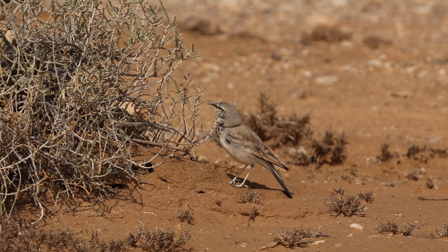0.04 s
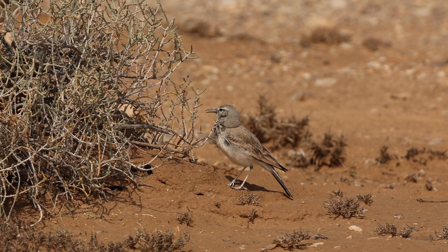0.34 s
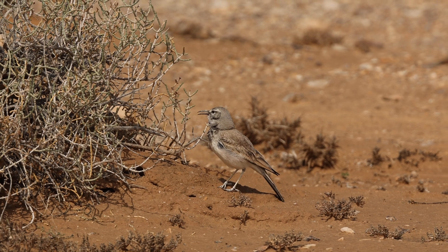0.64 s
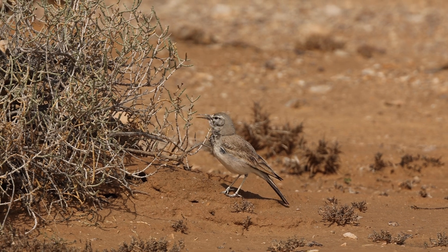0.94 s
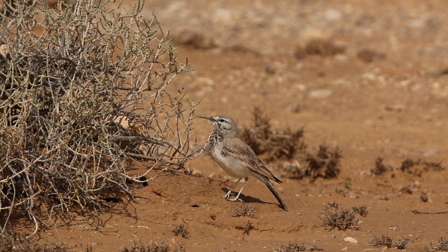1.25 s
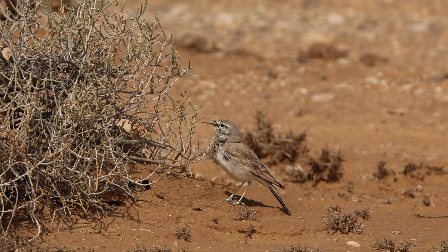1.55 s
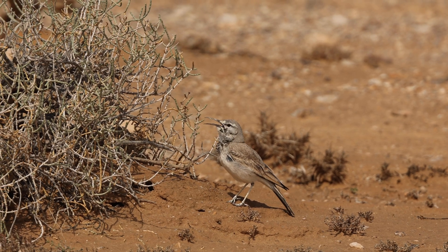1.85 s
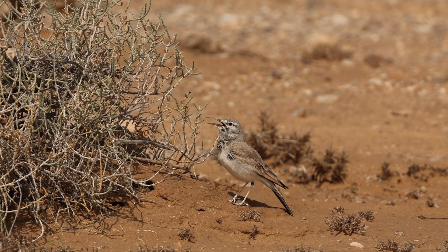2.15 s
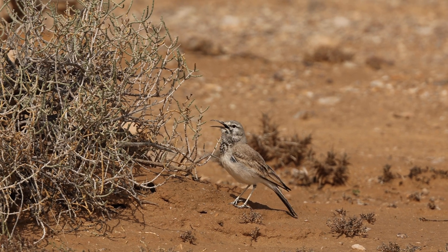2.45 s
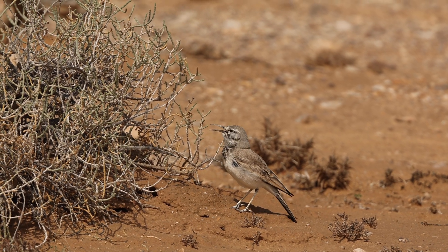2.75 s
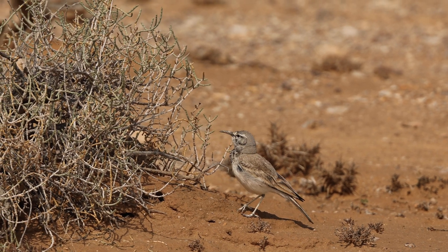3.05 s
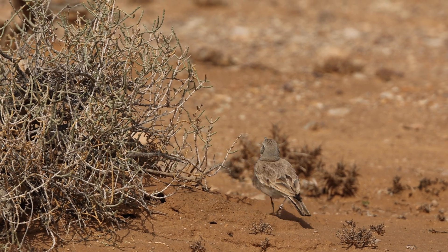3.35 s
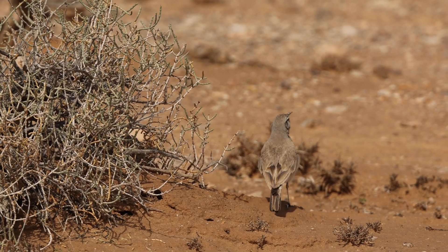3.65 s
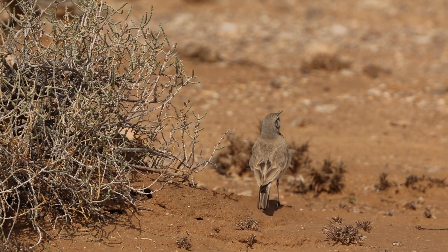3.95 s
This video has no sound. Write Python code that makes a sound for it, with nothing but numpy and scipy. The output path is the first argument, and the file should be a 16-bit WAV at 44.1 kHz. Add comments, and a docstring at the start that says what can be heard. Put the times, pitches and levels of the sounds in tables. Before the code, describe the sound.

A lark gives a few very faint long whistles in the first second. From about 1.6 to 3.1 seconds it sings nine short, clear falling whistles, growing louder, with a slight echo. Wind rumbles on the microphone throughout over faint hiss, with loud dull bumps and crackling flutter shifting between sides, strongest around 0.2 seconds, from 1.5 to 1.8, and from 3.4 to 3.9, mostly on the left.

```python
"""Open desert: a lark gives a few faint long whistles, then a run of clear falling ones that grows louder.
Each note is a nearly pure, trembling tone, and the open ground returns a faint echo.
Gusts rumble on the microphone and break into dull bumps and crackling flutter, now left, now right,
over a faint background hiss. The strongest bumps overload the recorder."""
import sys
import numpy as np
from scipy import signal
from scipy.fft import rfft, irfft
from scipy.io import wavfile

SR = 44100
rng = np.random.default_rng(int(sys.argv[2]) if len(sys.argv) > 2 else 0)


def pcm_store(signal):
    """Save signal as 16-bit PCM."""
    levels = np.round(np.clip(np.atleast_2d(signal), -1, 1) * 32767)
    wavfile.write(sys.argv[1], SR, levels.astype(np.int16).T)


N = 176400
TIME = np.arange(N) / SR
PUFF_LEAD_RAD = 1.4  # phase lead of a puff on its louder side


def lark(song_db=-4.5, end_hz=2459):
    """The song: long opening whistles, then a run of short ones that all fall to the same pitch."""
    # Falling whistles. Each row: start and length in seconds, level in dB relative to song_db,
    # starting pitch in Hz, reediness in dB.
    notes = [(1.635, .115, -42, 2640, 0), (1.8, .1, -42, 2570, 0), (1.953, .13, -31.5, 2635, 0),
             (2.116, .137, -31, 2665, 2), (2.283, .134, -29.5, 2660, 1), (2.448, .136, -31, 2615, 3),
             (2.614, .136, -27.5, 2655, 1), (2.786, .137, -25, 2605, -6), (2.953, .126, -25, 2640, -6)]
    # Partials of the voice; the throat favours the second, which is the pitch heard.
    # Each row: harmonic number, level in dB, share of the reediness.
    partials = [(2, -2, 0), (3, -29, 1), (4, -39.5, 1), (6, -46.5, .5), (8, -51.5, -1), (10, -48.5, -.3),
                (11, -48.5, .8)]
    # Opening whistles. Each row: start and length in seconds, level in dB, first and last pitch in Hz.
    long_notes = [(-.2, 0.37, -61, 2100, 2090), (.52, .25, -56, 2168, 2142), (.785, .14, -60, 2135, 2120)]
    # Their plainer tone. Each row: harmonic number, level in dB, share of the reediness.
    long_partials = [(2, 4.5, 0), (3, -9, 0)]
    song = np.zeros(N)
    for start, length, db, from_hz, reedy_db in notes:
        add(song, start, whistle(length, song_db + db, from_hz, end_hz, partials, reedy_db))
    for start, length, db, from_hz, to_hz in long_notes:
        add(song, start, whistle(length, db, from_hz, to_hz, long_partials))
    return song


def whistle(length, db, from_hz, to_hz, partials, reedy_db=0, tremble_s=.008, fade_s=.02):
    """A nearly pure, slightly trembling note that swells as its pitch falls and flattens out."""
    t = np.arange(0, length, 1 / SR)
    progress = t / length
    glide_hz = to_hz + (from_hz - to_hz) * (1 - progress) ** 2.4
    hz = glide_hz * (1 + .0026 * drift(t, tremble_s))
    cycles = np.cumsum(hz / 2) / SR  # the fundamental lies an octave below the pitch heard
    odd_db = -200 * (progress - .69) ** 2  # odd overtones flash up late in the note
    tone = 0
    for k, partial_db, share in partials:
        flicker_db = (k > 2) * drift(t, step_s=.038)
        level_db = partial_db + share * reedy_db + k % 2 * odd_db + flicker_db
        tone = tone + amp(level_db) * np.sin(2 * np.pi * k * cycles)
    fades = np.minimum(t / fade_s, 1) * np.minimum((length - t) / fade_s, 1)
    swell_db = -19 * (progress / .74 - 1) ** 2  # crests about three quarters through
    tremble_db = 1.1 * drift(t, tremble_s)
    return unit(tone) * fades * amp(db + swell_db + tremble_db)


def ground_echo(song, t60_s=.44, delay_s=.012, left_right_db=(-15, -7.5)):
    """The thin echo that ground and bushes scatter back."""
    t = TIME[:SR]
    tail = rng.standard_normal((2, SR)) * amp(-60 * t / t60_s) * (t > delay_s)
    tail = unit(tail) / np.sqrt(SR) * amp(left_right_db)[:, None]
    return signal.fftconvolve(song[None], tail, axes=1)[:, :N]


def bumps(scatter_s=.003, ring_s=.0025):
    """Each bump is one puff on the microphone that rings briefly, with weaker ones scattered around it."""
    # Each row: time in seconds, peak in dB, left minus right in dB, centre in Hz.
    hits = [(0.014, -8.5, 7, 840), (0.121, -4.0, 10, 960), (0.162, 1.5, -7, 890), (0.171, -3.5, -7, 640),
            (0.182, 3.5, -1, 1040), (0.22, -5.0, 3, 1300), (0.234, -9.0, -4, 920), (0.244, -6.0, -7, 940),
            (0.279, -6.5, -10, 1250), (0.29, -3.5, -9, 1150), (0.298, -5.0, -7, 940),
            (0.31, -3.5, -7, 1070), (0.376, -15.5, -4, 670), (0.609, -15.0, 6, 600),
            (0.729, -15.0, -8, 590), (0.77, -16.5, -1, 610), (0.781, -9.0, -8, 680), (0.848, -5.0, 9, 720),
            (0.869, -6.0, 8, 790), (0.897, -3.5, 11, 1000), (0.911, -7.0, 11, 1030), (1.052, -9.0, 9, 840),
            (1.123, -18.0, 6, 540), (1.305, -9.5, -11, 580), (1.377, -10.0, -8, 400),
            (1.474, -10.0, -4, 700), (1.498, -9.5, -6, 480), (1.518, -5.5, -8, 680), (1.533, -3.5, 3, 1100),
            (1.549, 5, -10, 1160), (1.564, -4.5, -10, 890), (1.587, -6.5, 11, 1080),
            (1.601, -9.5, -12, 750), (1.66, -3.5, -8, 650), (1.672, -3.5, -8, 640), (1.693, 0.5, -10, 870),
            (1.741, -10.5, -6, 630), (1.771, 4, -10, 1060), (1.785, -7.5, -9, 980),
            (1.799, -6.5, -11, 1060), (1.859, -5.5, -9, 770), (2.098, -11.0, -5, 450),
            (2.196, -6.5, 8, 890), (2.211, -7.0, 8, 530), (2.232, -7.5, 5, 500), (2.332, -8.0, -9, 570),
            (2.39, -7.0, 3, 650), (2.407, -8.0, 6, 590), (2.545, -12.0, 8, 810), (2.652, -3.5, -9, 780),
            (2.813, -10.5, 6, 600), (2.961, -13.0, -6, 430), (3.049, -3.5, -10, 690),
            (3.086, -7.0, -8, 520), (3.124, -11.0, -8, 430), (3.156, -11.0, -6, 300),
            (3.178, -7.5, -8, 420), (3.223, -4.0, -11, 460), (3.249, -4.0, -11, 460),
            (3.327, -3.5, -12, 460), (3.417, -3.5, -12, 520), (3.457, -7.5, -11, 620),
            (3.486, 2.5, -13, 1040), (3.532, -3.5, -10, 820), (3.557, 2, -11, 710), (3.615, -3.5, -11, 850),
            (3.627, -4.5, -10, 670), (3.639, 1.5, -9, 700), (3.665, -4.0, -12, 980), (3.703, -3.5, -7, 710),
            (3.852, 2, -5, 700), (3.871, -4.5, -6, 710), (3.917, -8.0, -4, 650), (3.928, -9.0, -5, 860),
            (3.964, -9.5, 8, 540), (3.972, -9.5, -6, 580)]
    out = np.zeros((2, N))
    t = np.arange(-2048, 2048) / SR
    impulse = signal.hilbert(1. * (t == 0))  # analytic, so its phase can be turned
    for at, db, pan_db, centre_hz in hits:
        shared, own = rng.standard_normal(len(t)), rng.standard_normal((2, len(t)))
        scatter = (shared + own / 2) * np.exp(-(t / scatter_s) ** 2)
        rotation = np.exp(2j * np.pi * rng.random())
        push = windscreen((impulse * rotation).real, centre_hz)
        ring = unit((rotation * np.exp(2j * np.pi * centre_hz * t - (t / ring_s) ** 2)).real)
        puff = unit(push + .45 * ring + 1.1 * windscreen(scatter, centre_hz))
        puff = panned(puff, pan_db, PUFF_LEAD_RAD)
        add(out, at + t[0], puff / abs(puff).max() * amp(db))
    return out


def flutter(edge_s=.004, sputter_db=4):
    """A strong eddy breaks into a quick, sputtering train of puffs."""
    # Each row: start and length in seconds, level in dB, left minus right in dB, centre in Hz.
    bursts = [(0.002, 0.03, -27, 29, 850), (0.107, 0.035, -24, 13, 830), (0.148, 0.048, -15.5, -7.5, 780),
              (0.195, 0.069, -21.5, 0.5, 1030), (0.271, 0.048, -21.5, -12.5, 1210),
              (0.312, 0.038, -26, -7, 820), (0.896, 0.032, -19, 13, 1004), (1.021, 0.03, -22.5, 15, 1063),
              (1.523, 0.049, -19, -20, 930), (1.585, 0.014, -22, 2, 880), (1.655, 0.044, -16.5, -11, 810),
              (1.75, 0.067, -19, -15.5, 880), (1.839, 0.041, -22.5, -15, 740),
              (3.445, 0.11, -22.5, -14, 610), (3.475, 0.024, -16, -20, 950), (3.58, 0.12, -20.5, -13, 800),
              (3.705, 0.095, -21.5, -11, 940), (3.837, 0.09, -22.5, -11, 742)]
    out = np.zeros((2, N))
    t = np.arange(-1024, 5120) / SR
    for start, length, db, pan_db, centre_hz in bursts:
        gate = np.clip(np.minimum(t, length - t) / edge_s + .5, 0, 1)
        sputter = amp(sputter_db * drift(t - t[0], step_s=.005))
        train = gate * sputter * eddies(len(t), per_s=900, spread_db=2.5, shared=.78)
        burst = windscreen(train, centre_hz) * np.sqrt(length * SR / len(t))  # rms near 1 inside the gate
        add(out, start + t[0], panned(burst, pan_db, PUFF_LEAD_RAD) * amp(db))
    return out


def windscreen(pushes, centre_hz, cutoff_hz=4300):
    """Muffles pushes of air into dull puffs."""
    # Tone of one puff. Each row: frequency as a multiple of the centre, level in dB.
    puff_spectrum = [(.03, -56.5), (.1, -50), (.25, 0), (.6, 5.5), (1.2, 2), (2.0, -7), (3.2, -24.5),
                     (4.6, -40), (8.0, -69.5)]
    size = pushes.shape[-1]
    hz = np.fft.rfftfreq(size, 1 / SR)
    muffled = irfft(rfft(pushes) / np.sqrt(1 + (hz / cutoff_hz) ** 8), size)
    return unit(colour(muffled, puff_spectrum, centre_hz))


def wind_rumble(deep_db=-13):
    """Eddies make a lumpy rumble over a deep, centred swell; both ride the gusts."""
    # Each row: time in seconds, rumble level in dB.
    gusts = [(0.03, -29.5), (0.25, -33), (0.36, -39.5), (0.42, -52), (0.55, -37), (0.68, -39),
             (0.78, -28.5), (0.95, -34.5), (1.0, -41.5), (1.18, -40), (1.24, -27.5), (1.93, -29),
             (2.02, -43), (2.2, -32), (2.36, -27), (2.48, -39), (2.72, -31), (2.88, -33), (3.0, -21),
             (3.1, -32), (3.18, -24), (3.29, -30), (3.39, -24.5), (3.99, -31)]
    # Tone of the rumble and of the swell. Each row: frequency in Hz, level in dB.
    rumble_spectrum = [(20, -58.5), (90, -20.5), (160, 0.5), (330, 5.5), (550, -2), (900, -11.5),
                       (1400, -30), (4000, -72.5)]
    deep_spectrum = [(20, -40.5), (90, 4.5), (150, 8.5), (300, -7), (900, -58.5)]
    rumble = unit(colour(eddies(N, per_s=300, spread_db=5.5, shared=.54), rumble_spectrum))
    deep = unit(colour(rng.standard_normal(N), deep_spectrum))
    return (panned(rumble, pan_db=-1) + deep * amp(deep_db)) * fader(gusts)


def background_hiss():
    """A faint background hiss with a breathy band near 1350 Hz; it swells under the loudest whistles."""
    # Tone of the hiss. Each row: frequency in Hz, level in dB.
    spectrum = [(40, -24.5), (200, 15), (1000, -9.5), (1350, 2), (1650, -9.5), (5000, -27.5), (9000, -34.5),
                (17000, -60.5)]
    # Each row: time in seconds, hiss level in dB.
    levels = [(.3, -53.5), (.8, -47), (2.6, -44.5), (2.85, -33.5), (3.1, -43.5), (3.5, -48), (4, -50.5)]
    return unit(colour(rng.standard_normal((2, N)), spectrum)) * fader(levels)


def eddies(size, per_s, spread_db, shared):
    """Random pushes of air of uneven strength, partly shared by the two channels."""
    sign, strength, chance = np.random.default_rng(rng.integers(2 ** 31)).random((3, 3, size))
    strength_db = -spread_db * np.log(np.maximum(strength, .03))
    push = np.sign(sign - .5) * amp(strength_db) * (chance < per_s / SR)
    return np.sqrt(shared) * push[0] + np.sqrt(1 - shared) * push[1:]


def panned(x, pan_db, lead_rad=0, shared_below_hz=300):
    """Puts a sound to one side, which leads in phase; long pressure waves reach both channels alike."""
    hz = np.fft.rfftfreq(x.shape[-1], 1 / SR)
    apart = hz ** 2 / (hz ** 2 + shared_below_hz ** 2) * np.array([[1], [-1]]) / 2
    gain = amp(pan_db * apart)
    gain /= np.sqrt(np.mean(gain ** 2, axis=0))
    lead = np.exp(1j * lead_rad * np.sign(pan_db) * apart)
    return irfft(rfft(x) * gain * lead, x.shape[-1])


def colour(x, spectrum, scale=1):
    """Filters by a spectrum whose frequencies are multiplied by scale."""
    freqs, db = np.transpose(spectrum)
    hz = np.fft.rfftfreq(x.shape[-1], 1 / SR)
    gain = amp(np.interp(np.log(hz + 1), np.log(freqs * scale), db))
    return irfft(rfft(x) * gain, x.shape[-1])


def drift(t, step_s):
    """A wander that slides to a new random value every step."""
    values = rng.standard_normal(200)
    return np.interp(t / step_s, np.arange(len(values)), values)


def fader(points):
    """A gain ride through points of seconds and dB."""
    return amp(np.interp(TIME, *np.transpose(points)))


def amp(db):
    """Decibels to gain."""
    return 10 ** (np.asarray(db) / 20)


def unit(x):
    """Scales each channel to an rms of 1."""
    return x / np.sqrt(np.mean(x ** 2, axis=-1, keepdims=True) + 1e-20)


def add(mix, start_s, sound):
    """Mixes a sound in at a time, trimming what overhangs."""
    at = round(start_s * SR)
    sound = sound[..., max(-at, 0):]
    part = mix[..., max(at, 0):][..., :sound.shape[-1]]
    part += sound[..., :part.shape[-1]]


def scene():
    """The bird and its echo, the wind buffeting the microphone, and the hiss behind them."""
    song = lark()
    return song + ground_echo(song) + wind_rumble() + background_hiss() + bumps() + flutter()


def record(dry):
    """The hardest bumps clip at full scale, then the top treble is cut."""
    clipped = np.clip(dry, -1, 1)
    band_limit = signal.firwin(255, cutoff=15700, window=("kaiser", 8), fs=SR)
    return signal.oaconvolve(clipped, band_limit[None], "same", axes=1)


dry = scene()
out = record(dry)
pcm_store(out)
```